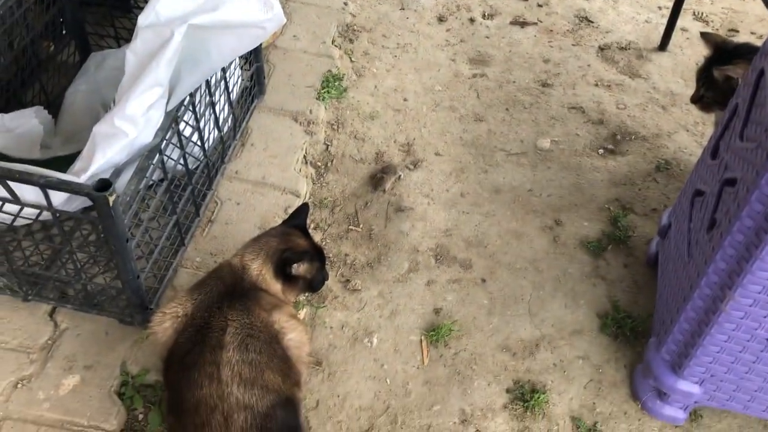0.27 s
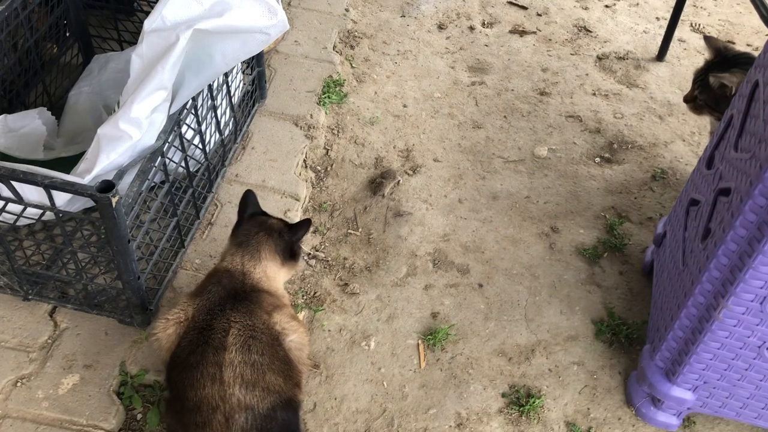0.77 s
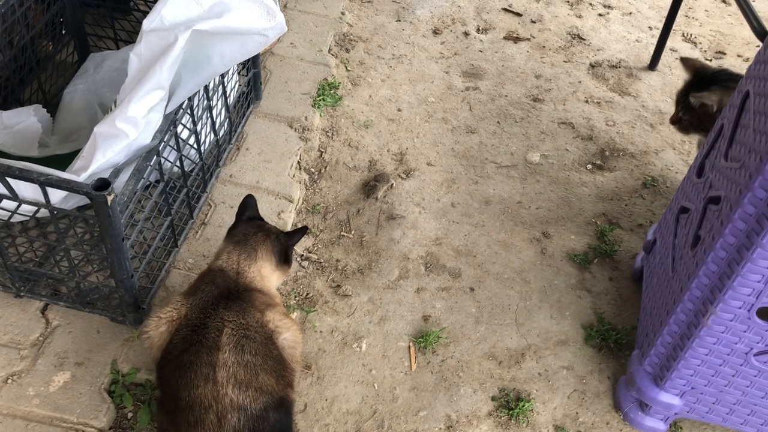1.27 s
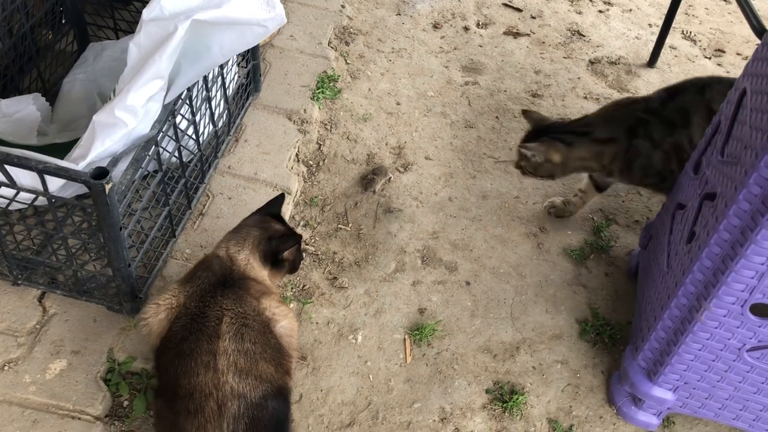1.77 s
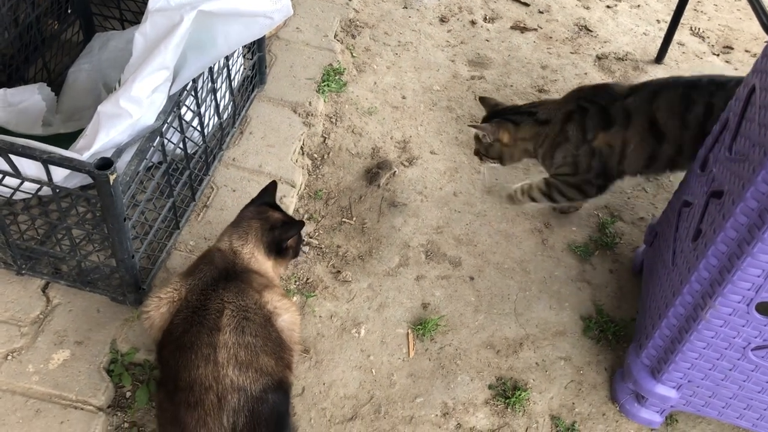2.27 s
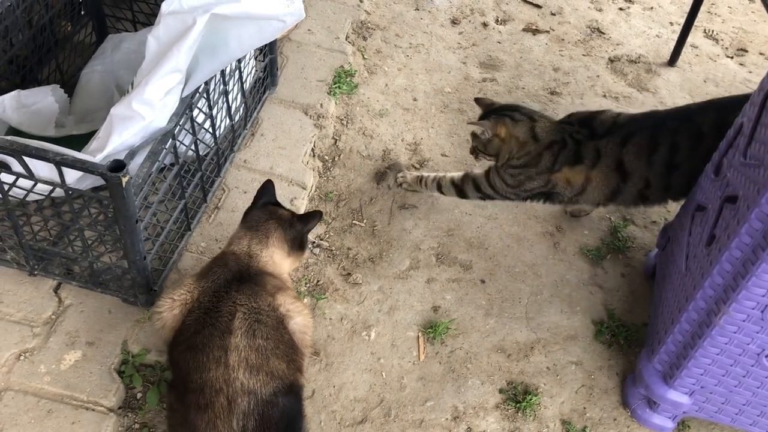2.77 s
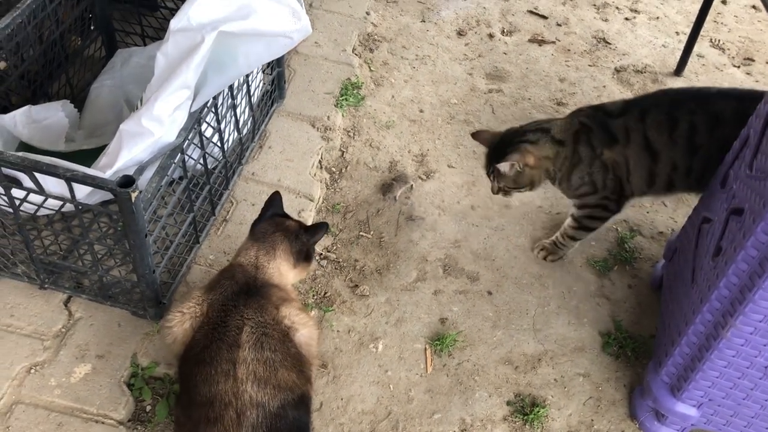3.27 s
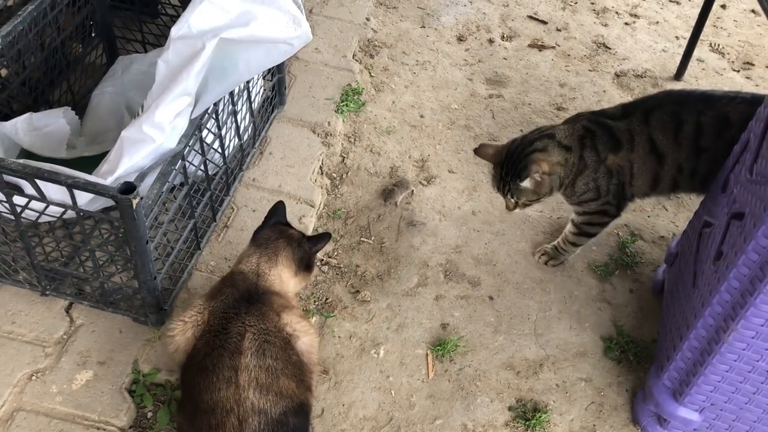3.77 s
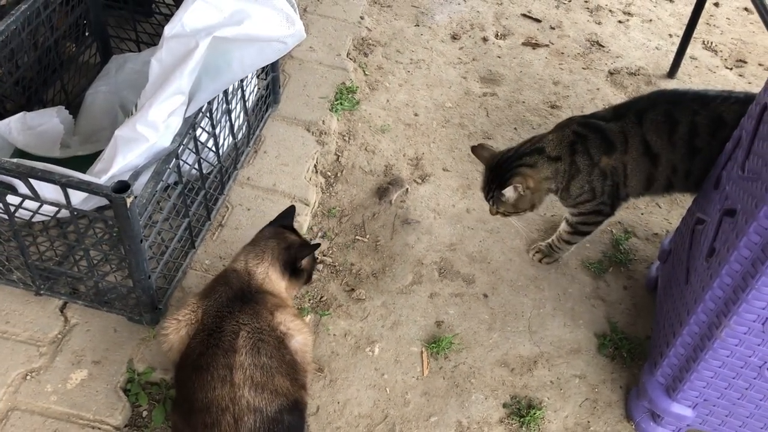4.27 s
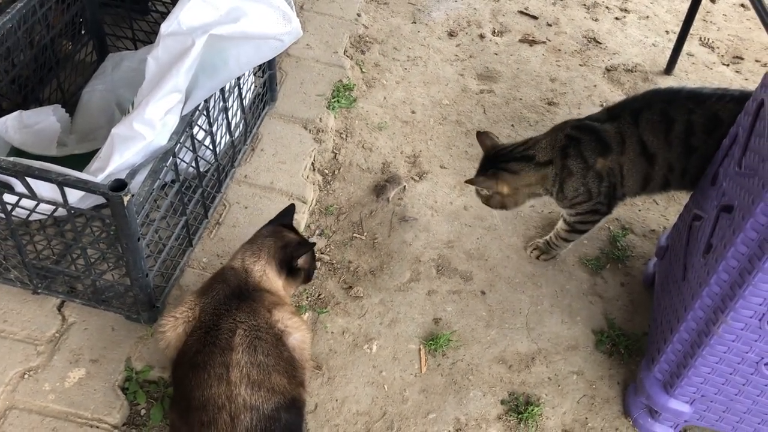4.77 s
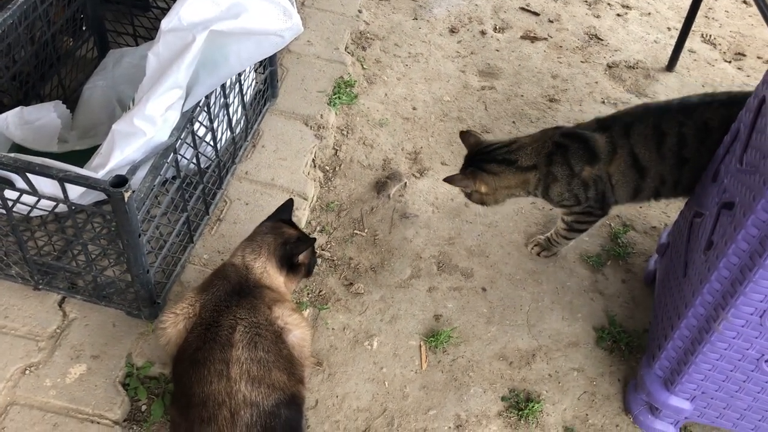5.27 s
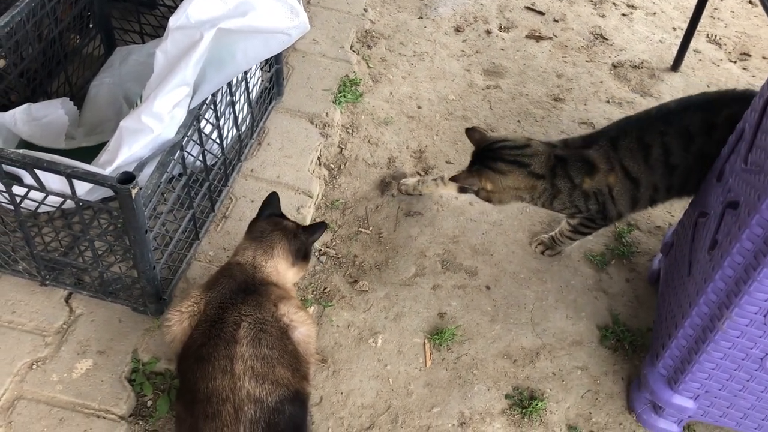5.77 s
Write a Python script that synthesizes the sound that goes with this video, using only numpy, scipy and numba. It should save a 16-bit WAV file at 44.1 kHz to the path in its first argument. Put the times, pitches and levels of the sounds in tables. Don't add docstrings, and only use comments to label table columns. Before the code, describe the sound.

A phone microphone catches its own case first: close, rough skin rubbing, a loud crisp click, then a short second slide. The rest is very quiet outdoor air with low far traffic, light taps and tiny grip shifts. Small distant birds chirp downward and twitter, one clearer high whistle comes late, and an insect throbs barely audibly. Dry, close handling; faint open background.

```python
import sys
import numpy as np
from scipy import signal
from scipy.fft import rfft, irfft
from scipy.io import wavfile
from scipy.ndimage import uniform_filter1d
from numba import njit

SR = 44100
rng = np.random.default_rng(int(sys.argv[2]) if len(sys.argv) > 2 else 0)


def to_wav(s):
    ch = np.atleast_2d(s).T
    pcm = np.round(np.clip(ch, -1, 1) * 32767)
    wavfile.write(sys.argv[1], SR, pcm.astype(np.int16))


def convert_level_to_amplitude(level_db):
    exponent = np.asarray(level_db, float) / 20
    return 10 ** exponent


N = 265129

# [f/Hz, width/Hz, level/dB]
CASE_RING = [(579, 283, 1), (732, 266, 2.5), (1080, 241, -3.5)]
# [f/Hz, width/Hz, level/dB]
SCRAPE_BANDS = [(1900, 1170, 9), (2600, 1210, 12), (1610, 480, 4), (3300, 3900, -24.5), (4100, 810, -11),
                (7000, 4200, -30)]
# [f/Hz, width/Hz, level/dB]
THUD_MODES = [(72, 34, -6.5), (150, 75, -2), (232, 80, -1.5), (345, 190, -0.5)]
# [t/s, pressure level/dB, scrape brightness from speed/dB]
SLIDE = [
    (0, -29.5, -5.5),
    (.025, -39, 2.5),
    (.22, -38, -0.5),
    (.285, -44, 1),
    (.38, -35.5, -4),
    (.49, -29, -1),
    (.575, -34, -4.5),
    (.625, -43, -3),
    (.88, -52, -6),
]
# [full pressure t/s, hold/s, level/dB, fade/(dB/s)]
GRIP_SHIFTS = [(.918, 0.018, -39, 92), (1.2, 0.061, -58, 250), (1.47, .01, -62.5, 217),
               (1.61, 0.015, -63, 94), (1.9, 0.032, -59, 291), (2.0, 0.021, -79, 150),
               (2.22, 0.023, -69.5, 196), (2.44, 0.026, -69, 125), (3.01, 0.011, -70, 396),
               (3.14, 0.035, -62, 200), (3.235, 0.032, -62.5, 300), (3.42, .05, -69, 64),
               (3.69, .01, -71.5, 400), (3.78, 0.035, -67.5, 200), (4.08, 0.029, -63.5, 250),
               (4.21, 0.015, -63, 402), (4.33, .02, -82, 400)]
# [t/s, peak level/dB]
KNOCKS = [
    (0.001, -26),
    (0.009, -42),
    (0.913, -34.5),
    (1.197, -51),
    (1.899, -49),
    (1.935, -43),
    (3.7764, -44),
    (3.813, -52),
    (3.844, -54),
]
# [f/Hz, level per Hz/dB]
YARD_COLOUR = [(76, -31.5), (130, 0.5), (179, 0), (326, -3), (619, -4.5), (1000, -11.5), (2720, -16),
               (15500, -29)]
# [t/s, level/dB]
TRAFFIC = [(0, -64), (.6, -67.5), (1.6, -68), (2.3, -69.5), (2.7, -71), (4.4, -70), (6.01, -71)]
# [f/Hz, width/Hz, level/dB]
RUMBLE_MODES = [(52.3, 12, -9.5), (78.4, 15, -4.5), (106.3, 43, -8.5)]
# [t/s, hold/s, level/dB, fade/(dB/s)]
SWAYS = [(1.3, 0.019, -66, 152), (1.67, 0.055, -73, 40), (2.0, 0.017, -66, 158), (2.21, 0.18, -70, 98),
         (2.67, 0.025, -64.5, 60), (2.93, 0.019, -63, 197), (3.12, 0.012, -63, 300), (3.27, .03, -70, 200),
         (3.42, 0.034, -64.5, 63), (5.71, .03, -75.5, 100)]
# [f/Hz, width/Hz, level/dB]
SWAY_BODY = [(142, 60, 4), (210, 99, -2.5)]
# [t/s, peak level/dB, treble tilt/(dB/octave), share of full ring time]
SNAPS = [
    (0.4943, -24, 2, .8),
    (0.4948, -19, 0, .9),
    (0.4954, -23, 2, .8),
    (0.4961, -26, 2, .55),
    (0.4981, -25, 8, .4),
    (0.8245, -60, 4, .5),
    (0.999, -66, 3, .5),
]
# [f/Hz, level/dB, t60/s]
SNAP_MODES = [(2900, -11, .01), (3400, -11, .01), (4280, -1, .011), (5450, -7, .011), (6450, -4, .012),
              (7400, -11, .009), (8900, -10, .009), (10600, -15, .008), (12300, -28, .006),
              (15300, -35, .014)]
# [f/Hz, width/Hz, level/dB]
SNAP_HAZE = [(5000, 970, -4), (6300, 1200, 23), (9000, 2500, 8), (12500, 4000, -13)]
# [f/Hz, droop/Hz, hold/s, level/dB]
RUNGS = [(4650, 60, .03, -4), (4200, 50, .048, 0), (3780, 150, .04, -7), (3470, 130, .075, 2),
         (3100, 250, .05, -3), (2720, 30, .05, -2), (2450, 20, .027, 4)]
# [t/s, top f/Hz, bottom f/Hz, fall/(Hz/s), level/dB]
CHIRPS = [(.627, 4350, 3600, 20000, -75.5), (1.273, 4300, 2300, 17100, -75),
          (2.081, 4810, 2850, 32350, -74), (2.807, 4350, 2280, 18300, -75), (3.608, 3640, 2580, 20500, -76),
          (4.192, 4900, 2300, 17220, -77), (4.942, 4800, 2580, 27640, -76),
          (5.636, 4350, 2300, 19000, -76.5)]
# [t/s, top f/Hz, bottom f/Hz, fall/(Hz/s), level/dB]
RASPS = [(1.565, 4500, 2700, 25000, -73), (3.745, 4400, 2300, 70000, -73.5),
         (4.24, 4000, 2970, 8000, -79.5), (5.0, 3450, 2500, 30000, -79), (5.7, 3560, 2860, 6000, -78),
         (5.742, 4570, 2800, 60000, -74.5)]
# [t/s, length/s, start f/Hz, end f/Hz, level/dB]
WHISTLE = [
    (4.734, 0.012, 4700, 6000, -74),
    (4.745, 0.041, 6000, 5200, -67),
    (4.781, .04, 5210, 5200, -76),
]
# [t/s, length/s, start f/Hz, end f/Hz, level/dB]
TWITTER = [(1.668, .084, 4490, 4520, -81), (1.67, .097, 2310, 2350, -75), (1.732, 0.055, 4790, 4430, -81),
           (4.953, 0.039, 4300, 4240, -69), (3.309, .04, 3100, 2960, -78), (5.723, .11, 2730, 2646, -76),
           (4.609, 0.017, 2890, 2780, -79), (4.66, 0.037, 2950, 2350, -79), (5.746, 0.043, 3880, 4100, -75),
           (4.872, 0.041, 2900, 3650, -80), (4.89, 0.028, 4110, 4070, -79),
           (5.081, 0.096, 3360, 3380, -77.5), (5.131, 0.029, 3350, 2600, -77),
           (5.146, .06, 2500, 2300, -82), (5.225, 0.042, 2890, 2820, -81.5),
           (5.253, 0.031, 4260, 4200, -82), (5.272, .025, 3580, 3380, -78), (5.395, .04, 2540, 2400, -84),
           (5.476, .02, 2780, 2900, -79), (5.51, 0.029, 2900, 2420, -78), (5.543, 0.022, 4080, 3780, -77.5),
           (5.562, .047, 3560, 3750, -76), (5.59, 0.1, 2530, 2710, -78.5), (5.922, 0.045, 2515, 2600, -76)]
# [t/s, length/s, level/dB]
PIPS = [(1.47, .05, -77), (1.52, .07, -80), (1.617, .045, -77), (1.68, .05, -83), (1.79, .05, -84)]
# [t/s, hold/s, level/dB, fade/(dB/s)]
INSECT = [
    (5.17, .13, -93, 400),
    (5.52, .1, -93, 20),
]


@njit
def svf(x, hz, width):
    y, band, low = np.empty(len(x)), 0., 0.
    for i in range(len(x)):
        g, k = np.tan(np.pi * hz[i] / SR), width / hz[i]
        v = (band + g * (x[i] - low)) / (1 + g * (g + k))
        band, low, y[i] = 2 * v - band, low + 2 * g * v, k * v
    return y


def unit(x):
    return x / np.sqrt(np.mean(x ** 2))


def resonate(x, modes):
    out = np.zeros(len(x))
    for k, (hz, width_hz, db) in enumerate(modes):
        centre, width = np.full(len(x), 1. * hz), 1.46 * width_hz
        gain = (-1) ** k * convert_level_to_amplitude(db) / np.sqrt(width_hz)
        out += gain * svf(svf(x, centre, width), centre, width)
    return unit(out)


def columns(table):
    s, *rest = np.transpose(table)
    return [np.interp(np.arange(N) / SR, s, c) for c in rest]


def walk(rate_hz):
    k = int(SR / rate_hz)
    steps = np.repeat(rng.standard_normal(N // k + 1), k)
    return unit(uniform_filter1d(uniform_filter1d(steps, k), k)[:N])


def add(out, start_s, x):
    i = int(start_s * SR)
    out[i:i + len(x)] += x[:N - i]


def strokes(table, rise_db_s):
    t, power = np.arange(N) / SR, 0
    for s, hold, db, fade in table:
        rising = rise_db_s * np.maximum(s - t, 0)
        fading = fade * np.maximum(t - s - hold, 0)
        power = power + convert_level_to_amplitude(db - rising - fading) ** 2
    return np.sqrt(power)


def fading_noise(t60_s, length_s):
    t = np.arange(int(length_s * SR)) / SR
    x = rng.standard_normal(len(t)) * convert_level_to_amplitude(-60 * t / t60_s)
    return x / np.sqrt(np.sum(x ** 2))


def fingers(slips_per_s=5000, scatter_db=2.5, catch_db=1.0):
    rise_db_s, lift_s, lift_db_s = 386, 1.07, 306
    t, (slide_db, speed_db) = np.arange(N) / SR, columns(SLIDE)
    lifted = convert_level_to_amplitude(-lift_db_s * np.maximum(t - lift_s, 0))
    slide = convert_level_to_amplitude(slide_db) * (t < SLIDE[-1][0])
    second_slide = strokes(GRIP_SHIFTS[:1], rise_db_s) * lifted
    small_shifts = strokes(GRIP_SHIFTS[1:], rise_db_s)
    press = np.sqrt(slide ** 2 + second_slide ** 2 + small_shifts ** 2)
    thud_lag_s, thud_share, thud_db = .034, .86, -17
    keep = np.exp(-1 / (thud_lag_s * SR))
    palm = np.sqrt(signal.lfilter([1 - keep], [1, -keep], press ** 2)) ** thud_share
    scrape_db = np.where(t < lift_s, -13 + speed_db, -12.5)
    happens, side, strength = rng.random((3, N))
    slips = (happens < slips_per_s / SR) * np.sign(side - .5)
    slips = slips * convert_level_to_amplitude(-scatter_db * np.log(1 - .98 * strength))
    catch = convert_level_to_amplitude(catch_db * np.clip(walk(70), -2, 1.6))
    fine = rng.standard_normal(N) * catch ** 1.5
    ring = resonate(slips * catch, CASE_RING)
    out = press * (ring + convert_level_to_amplitude(scrape_db) * resonate(fine, SCRAPE_BANDS))
    out = out + palm * convert_level_to_amplitude(thud_db) * resonate(fine, THUD_MODES)
    knock = resonate(signal.unit_impulse(SR // 20), CASE_RING + [(297, 330, 6.0)])
    knock = knock / np.max(np.abs(knock))
    for s, db in KNOCKS:
        add(out, s, convert_level_to_amplitude(db - 3.5) * knock)
    return out


def yard():
    traffic_db = columns(TRAFFIC)[0]
    hiss_db, drop_db, drop_s, drop_length_s = -66, -2.5, 4.43, .092
    hiss_db = hiss_db + drop_db * np.clip((np.arange(N) / SR - drop_s) / drop_length_s, 0, 1)
    hz = np.fft.rfftfreq(N, 1 / SR)[1:]
    colour_hz, colour_db = np.transpose(YARD_COLOUR)
    spectrum = rfft(rng.standard_normal(N))[1:] * convert_level_to_amplitude(np.interp(np.log(hz), np.log(colour_hz), colour_db))
    spectrum = spectrum / np.sqrt(np.mean(irfft(np.append(0, spectrum), N) ** 2))
    out, swell = 0, walk(1.73)
    for octave in np.arange(4, 15, .5):
        share = np.clip(1 - 2 * np.abs(np.log2(hz) - octave), 0, 1)
        low = np.clip((12.5 - octave) / 5, .05, 1)
        db = low * (traffic_db + .6 * swell + walk(8)) + (1 - low) * hiss_db
        out = out + convert_level_to_amplitude(db) * irfft(np.append(0, spectrum * share), N)
    rumble_db, wander_db, thump_db = -72, 1.2, -6.5
    sway = np.hypot(convert_level_to_amplitude(rumble_db + wander_db * walk(6)), strokes(SWAYS, 170))
    thump = strokes(SWAYS, 150) * resonate(rng.standard_normal(N), SWAY_BODY)
    return out + convert_level_to_amplitude(thump_db) * thump + sway * resonate(rng.standard_normal(N), RUMBLE_MODES)


def snaps():
    rise_s, haze_db, haze_t60_s, haze_length_s = .0001, -63, .16, .12
    out, t = np.zeros(N), np.arange(SR // 20) / SR
    onset = 1 - np.exp(-(t / rise_s) ** 2)
    for s, db, tilt_db, share in SNAPS:
        ring = np.zeros(len(t))
        for hz, mode_db, t60_s in SNAP_MODES:
            gain = convert_level_to_amplitude(mode_db + tilt_db * np.log2(hz / 4300))
            ring += gain * np.sin(2 * np.pi * hz * t) * convert_level_to_amplitude(-60 * t / (t60_s * share))
        add(out, s, convert_level_to_amplitude(db) * onset * ring)
    haze = resonate(fading_noise(haze_t60_s, haze_length_s), SNAP_HAZE)
    add(out, SNAPS[0][0], convert_level_to_amplitude(haze_db) * haze)
    return out


def breath(air, hz, width_hz):
    return unit(svf(svf(air, hz, width_hz), hz, width_hz))


def notes():
    easy_fall_hz_s, pip_hz = 17500, 1966
    rungs = []
    for s, top, low, fall, db in CHIRPS:
        for hz, droop, hold, rung_db in RUNGS:
            if low < hz < top:
                length = hold * np.sqrt(easy_fall_hz_s / fall)
                rungs.append((s + (top - hz) / fall, length, hz, hz - droop, db + rung_db))
    return rungs + WHISTLE + TWITTER + [(s, length, pip_hz, pip_hz, db) for s, length, db in PIPS]


def birds():
    waver_hz, flutter_db = 35, 1.8
    far_breath, near_breath, near_hz, breath_hz = .38, .06, 4690, 300.
    buzz_db, buzz_hz, buzz_over_s = 1, 1300., .045
    echo_db, echo_t60_s = -7, .2
    out, waver, flutter = np.zeros(N), walk(220), convert_level_to_amplitude(flutter_db * walk(260))
    note_air, buzz_air = rng.standard_normal((2, N))
    for s, length, start_hz, end_hz, db in notes():
        i, u = int(s * SR), np.linspace(0, 1, int(length * SR))
        hz = start_hz + (end_hz - start_hz) * u + waver_hz * waver[i:i + len(u)]
        share = near_breath if min(start_hz, end_hz) > near_hz else far_breath
        tone = np.sqrt(2 - 2 * share) * np.sin(2 * np.pi * np.cumsum(hz) / SR)
        voice = tone + np.sqrt(share) * breath(note_air[i:i + len(u)], hz, breath_hz)
        add(out, s, convert_level_to_amplitude(db) * np.sin(np.pi * u) ** .17 * voice)
    for s, top, low, fall, db in CHIRPS + RASPS:
        length = (top - low) / fall + buzz_over_s
        i, u = int(s * SR), np.linspace(0, 1, int(length * SR))
        buzz = breath(buzz_air[i:i + len(u)], top + (low - top) * u, buzz_hz)
        add(out, s, convert_level_to_amplitude(db + buzz_db) * np.sin(np.pi * u) ** .8 * buzz)
    out = out * flutter
    return out + convert_level_to_amplitude(echo_db) * signal.fftconvolve(out, fading_noise(echo_t60_s, .4))[:N]


def insect():
    line_hz, width_hz, throb_hz = 10100, 90, 22
    throb = 1 + .77 * np.sin(2 * np.pi * throb_hz * np.arange(N) / SR)
    line = resonate(rng.standard_normal(N), [(line_hz, width_hz, 0)])
    return strokes(INSECT, 300) * throb * line


def scene():
    return (fingers() + yard() + snaps() + birds() + insect())[None]


def low_pass(x):
    return signal.sosfilt(signal.butter(12, 16440, fs=SR, output="sos"), x)


def record(dry):
    limit, top_hz = .3, 15750
    rounded = limit * np.tanh(dry / limit)
    steep = signal.ellip(10, .2, 60, top_hz, fs=SR, output="sos")
    return low_pass(signal.sosfilt(steep, rounded))


dry = scene()
out = record(dry)
to_wav(out)
```